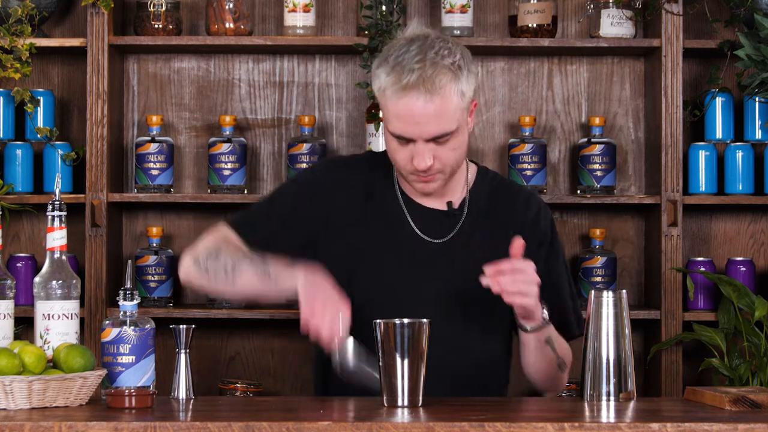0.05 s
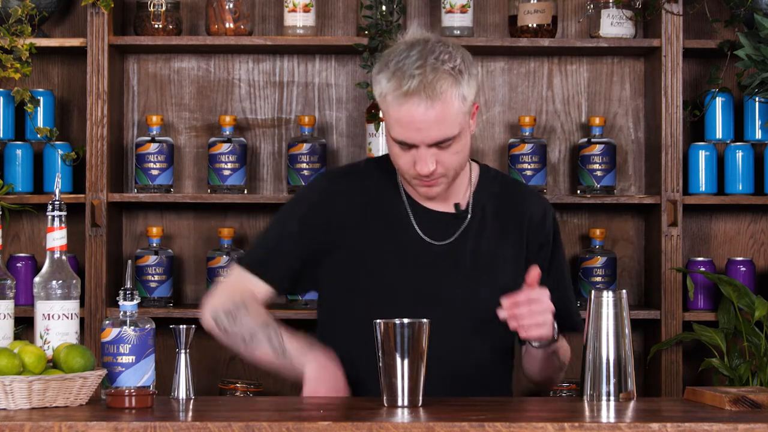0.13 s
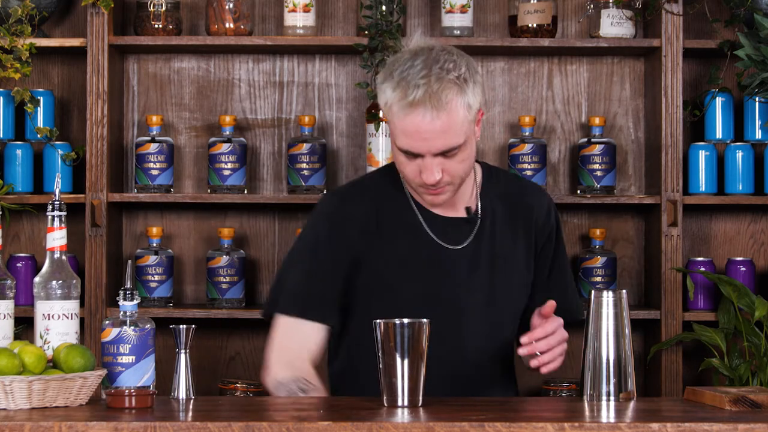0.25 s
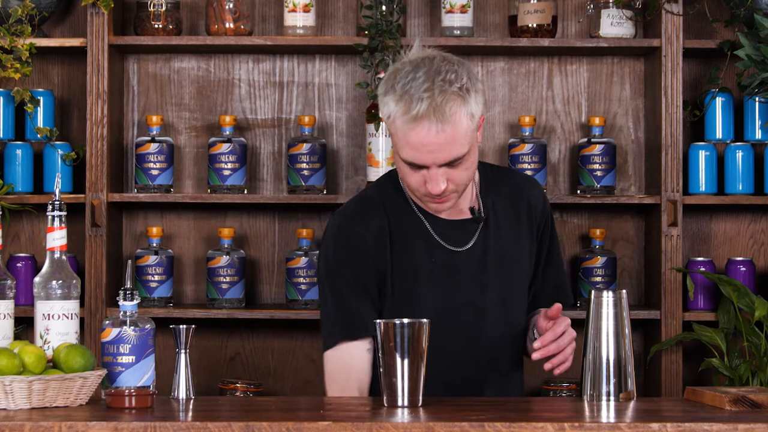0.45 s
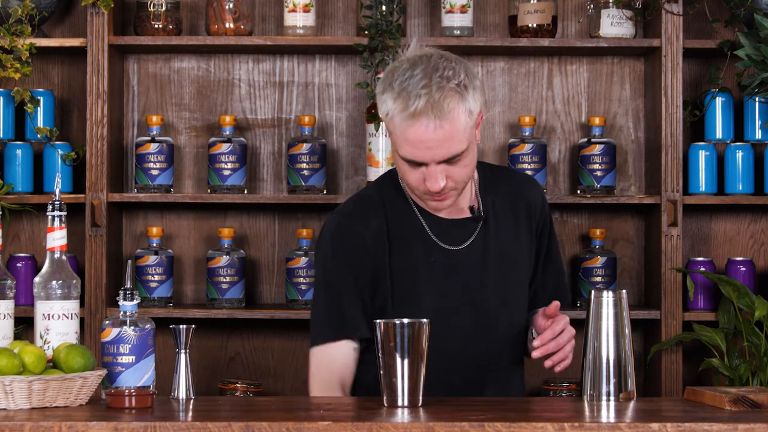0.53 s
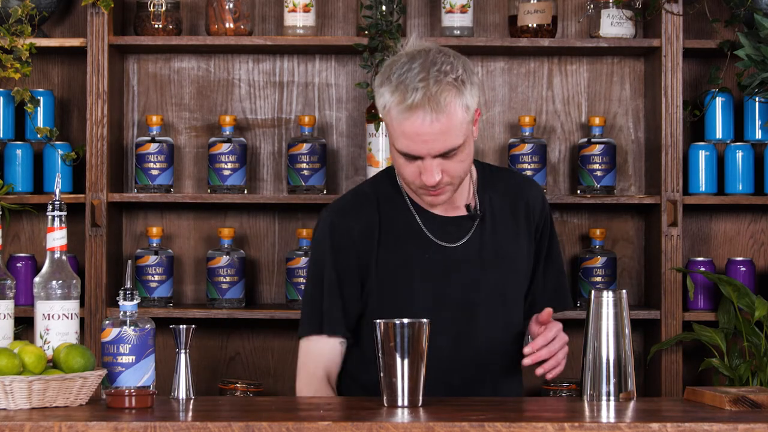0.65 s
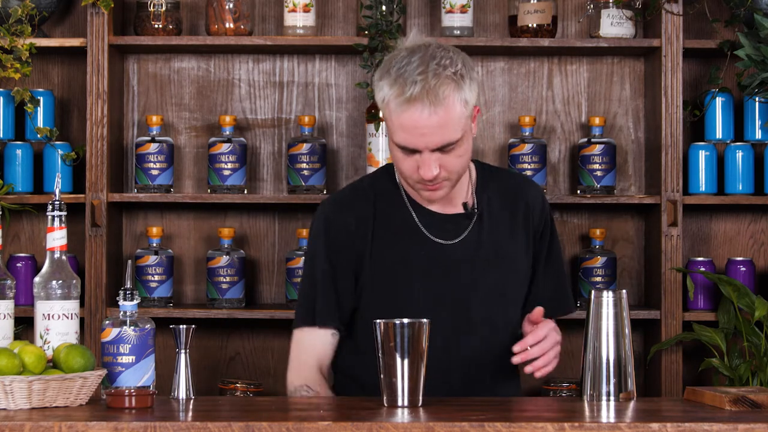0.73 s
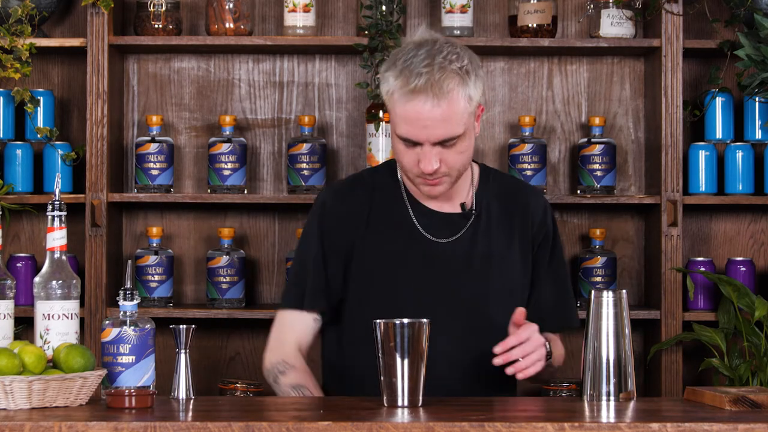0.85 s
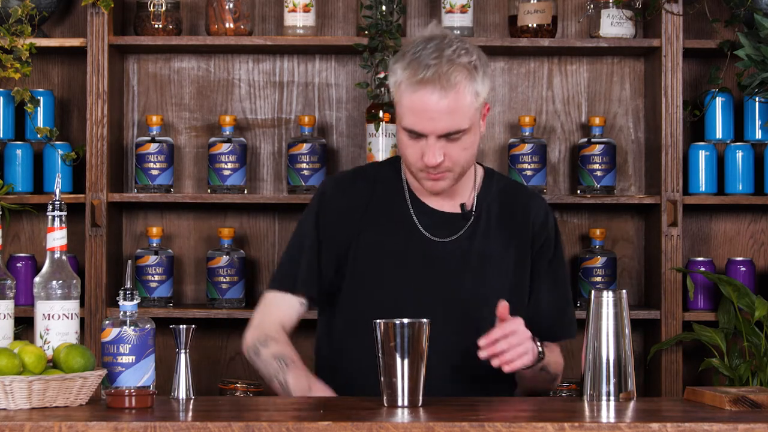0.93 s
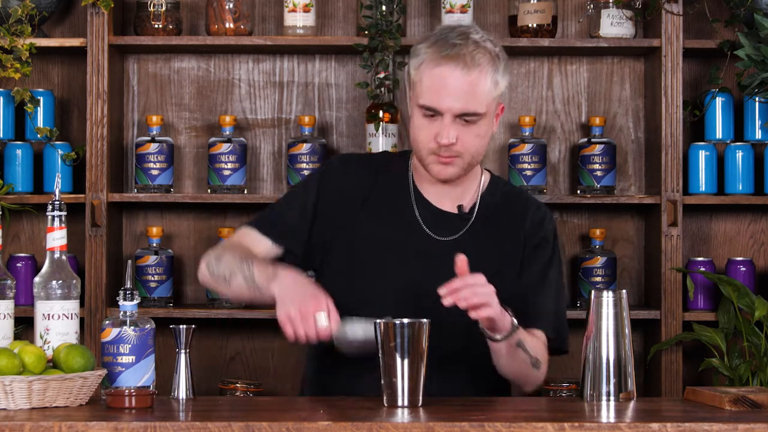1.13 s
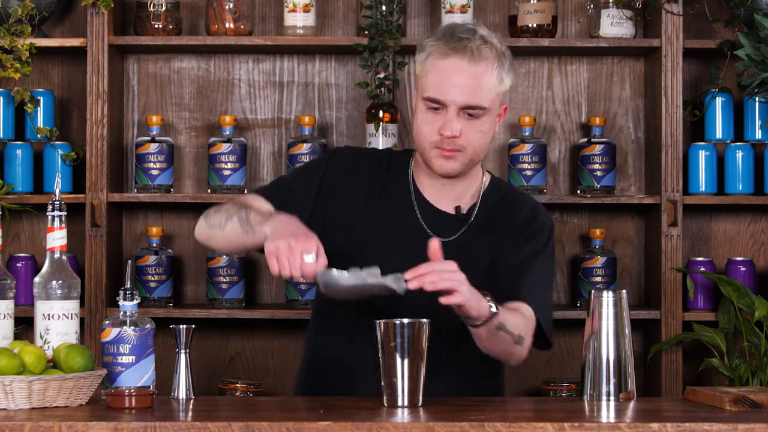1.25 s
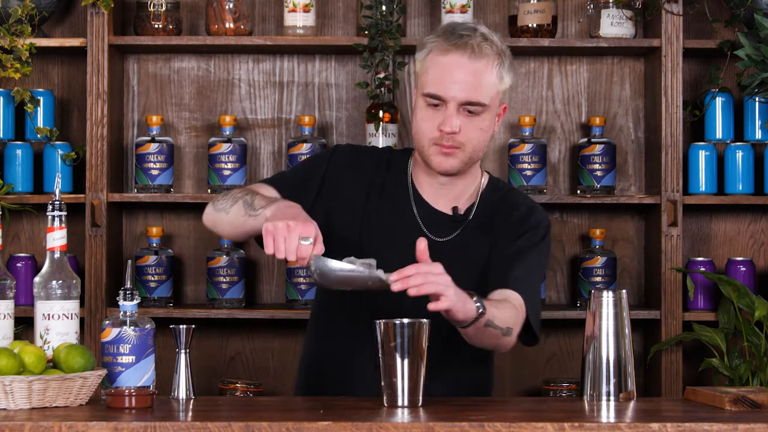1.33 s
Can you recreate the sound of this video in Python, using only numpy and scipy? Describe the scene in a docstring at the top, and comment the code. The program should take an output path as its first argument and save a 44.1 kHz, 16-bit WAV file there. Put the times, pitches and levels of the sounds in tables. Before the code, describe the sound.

Ice is scooped once from a bin under a bar counter, heard close up in a quiet room. The metal blade clinks, cubes clatter and crunch, and the rattle fades into a short scrape and light clicks.

```python
"""Scooping ice under a bar counter

Close microphone on an ice bin in a quiet room. A metal scoop digs in and its blade clinks,
duller once ice covers it. Cubes crunch, tumble and knock, and the hollow bin rings with them.
The full scoop slides out with a short drone, and a few cubes settle in it in the air."""
import sys
import numpy as np
from scipy import signal
from scipy.fft import rfft, irfft
from scipy.io import wavfile

SR = 44100
rng = np.random.default_rng(int(sys.argv[2]) if len(sys.argv) > 2 else 0)


def int16_out(signal):
    """Quantize to a 16-bit WAV file."""
    q = np.round(np.clip(np.atleast_2d(signal).T, -1, 1) * 32767)
    wavfile.write(sys.argv[1], SR, q.astype(np.int16))


N = 61739
T = np.arange(N) / SR

# Spectral shape of each source: frequency_hz, relative_db
ROOM_COLOUR = [(25, -13.5), (100, 6), (170, -7), (260, 5), (500, 2.5), (1200, -3.5), (2500, -14.5),
               (6000, -21), (15000, -28.5)]
RUMBLE_COLOUR = [(25, -21), (50, -13.5), (75, -5.5), (130, 2), (200, -4), (400, -26), (2000, -48)]
DRAG_COLOUR = [(100, -52), (220, -3.5), (330, -1.5), (430, 5.5), (560, -6), (720, -1), (1000, -18),
               (4000, -36)]
TUMBLE_COLOUR = [(35, -34), (90, -16), (160, -4.5), (350, -1), (750, -2), (1400, -4.5), (2100, -9),
                 (3500, -18), (6000, -32), (16000, -62.5)]
KNOCK_COLOUR = [(60, -22), (250, 1.5), (700, 5.5), (1500, 2.5), (2400, -11.5), (5000, -11), (15000, -40)]
CRACKLE_COLOUR = [(300, -27), (1500, -9.5), (2300, -5), (3300, 2.5), (4400, -4), (5100, -1), (6200, -3.5),
                  (7400, -6), (8800, -3.5), (10500, -7.5), (15500, -10.5)]
CLINK_COLOUR = [(200, -21.5), (900, -8.5), (2300, -14.5), (3200, -7.5), (4200, 1.5), (5600, -1.5),
                (7400, -6.5), (9000, -5), (12000, -6), (16000, -17)]
# Resonances of the hollow bin and of the metal scoop: pitch_hz, level_db, t60_s
BIN_MODES = [(193, 0.5, 0.21), (270, -3, .25), (300, -3.5, .28), (395, 8, 0.18), (455, 1, 0.38),
             (611.5, 0.5, 0.35), (710, 2, 0.31), (730, 6.5, 0.18), (857, -4.5, .22), (1034, -14, 0.16),
             (1081, -9, .22), (1255, -11.5, .2), (1283, 0, 0.31), (1420, -2, 0.15)]
SCOOP_MODES = [(3004, -1, .065), (3870, -10, 0.05), (4340, -5, .055), (4480, -9, 0.054), (5260, -0.5, .035),
               (5656, 2, .04), (6380, 0, 0.039), (8200, -5, .035), (8560, -6, .035), (8970, -10.5, .035),
               (11300, -10, .035), (13250, -16.5, 0.025)]
# Cubes shoved about by the scoop: time_s, level_db
TUMBLE_LEVELS = [(.259, -33), (.264, -26), (.277, -32), (.284, -22), (.32, -24), (.345, -20.5), (.384, -23),
                 (.425, -21), (.45, -18.5), (.472, -28), (.54, -31.5), (.62, -31), (.688, -39),
                 (.745, -38.5), (.795, -35.5), (.825, -45.5), (.935, -47.5), (1.01, -41.5), (1.06, -56.5),
                 (1.145, -66), (1.22, -60.5), (1.29, -81.5)]
# Ice cracking along the blade: time_s, level_db
CRACKLE_LEVELS = [(.259, -70), (.264, -31.5), (.31, -29), (.35, -25), (.384, -29.5), (.415, -31),
                  (.45, -32.5), (.475, -36.5), (.535, -42), (.575, -36.5), (.645, -39.5), (.69, -45),
                  (.72, -43.5), (.785, -40.5), (.835, -57), (.92, -46), (.94, -52.5), (1.01, -45.5),
                  (1.04, -62.5), (1.15, -71.5), (1.29, -83)]
# Top treble as ice covers the blade: time_s, gain_db
TREBLE_GAINS = [(0, 9.5), (.32, -1.5), (.375, -17), (.42, 0), (.47, -15.5), (.6, -12.5), (.8, -22.5),
                (1.0, -19)]
# The bin is bumped: start_s, level_db, pitch_hz
BIN_BUMPS = [(0.232, -34.5, 159), (0.294, -32, 90), (.342, -25, 140), (0.383, -35, 75), (0.968, -34, 130),
             (1.301, -50, 89)]
# A cube settles in the raised scoop: start_s, level_db, pitch_hz
SETTLING_TICKS = [(.175, -51, 1120), (.190, -51, 1690), (1.206, -51, 4300), (1.337, -50, 3060),
                  (1.366, -49, 2160), (1.386, -41, 1850)]
# A cube knocks in the bin: start_s, level_db, pitch_hz
CUBE_KNOCKS = [(.228, -14, 894), (0.232, -25.5, 449), (.236, -14.5, 1150), (0.326, -11, 1440),
               (0.351, -14.5, 626), (.445, -18.5, 755), (.451, -23, 990), (.630, -10, 1170),
               (.715, -23.5, 485), (0.7293, -16, 1300), (.794, -19.5, 626), (.8505, -23.5, 740),
               (.899, -27, 417), (.925, -30.5, 396), (.969, -22, 770), (1.160, -40, 1400),
               (1.184, -42, 598), (1.202, -33.5, 550), (1.232, -44, 903), (1.301, -46, 520)]
# The blade strikes a cube: start_s, level_db
BLADE_STRIKES = [(0.228, -9), (0.2392, -22.5), (0.262, -22), (.2665, -23.5), (.2805, -16.5), (.2835, -19.5),
                 (.3605, -26), (.411, -20), (.500, -32), (.517, -26), (.547, -25), (.554, -16.5),
                 (0.563, -17.5), (0.5664, -14), (.6312, -20.5), (.646, -31), (.670, -26), (.707, -31.5),
                 (.7305, -26.5), (0.754, -22), (0.7694, -14), (.7725, -22.5), (0.7833, -18), (.789, -26),
                 (.819, -23), (.885, -33), (.898, -34.5), (0.918, -36), (0.967, -29.5), (1.056, -45)]

TUMBLES_PER_S, TUMBLE_SCATTER_DB = 1800, 1.5
BLADE_HZ = 4420  # the blade's strongest resonance
CLINK_T60_S = 0.018


def amp(db):
    """Decibels to gain."""
    return 10 ** (np.asarray(db) / 20)


def unit(x):
    """Scale to rms 1."""
    return x / np.sqrt(np.mean(x ** 2))


def curve(points):
    """Gain over time from (time_s, level_db) points, silent before the first."""
    time_s, level_db = np.array(points).T
    return amp(np.interp(T, time_s, level_db, left=-120))


def fade(t60_s):
    """Exponential decay, 60 dB down after t60_s."""
    return np.exp(-np.log(1000) * T / t60_s)


def ring(hz, t60_s, size=12000):
    """One struck mode; it radiates no steady pressure."""
    t = T[:size]
    attack = 1 - np.exp(-4 * hz * t)
    motion = np.sin(2 * np.pi * hz * t) * fade(t60_s)[:size] * attack
    return np.diff(motion, prepend=0) / (2 * np.sin(np.pi * hz / SR))


def through(x, response):
    """Play a sound through an impulse response."""
    return signal.fftconvolve(x, response)[:N]


def colour(x, points):
    """Causal filter from (frequency_hz, relative_db) points that keeps the power of white noise."""
    hz, db = np.array(points).T
    grid_hz = np.maximum(np.fft.rfftfreq(N, 1 / SR), 1)
    gain = amp(np.interp(np.log(grid_hz), np.log(hz), db))
    cepstrum = irfft(np.log(gain), N)
    causal = cepstrum * (T > 0) * (T < T[-1] / 2)
    response = irfft(np.exp(2 * rfft(causal)), N)
    return through(x, response / np.linalg.norm(response))


def add(out, start_s, x):
    """Mix a sound in from start_s."""
    i = int(np.clip(start_s * SR, 0, N - 1))
    out[i:i + len(x)] += x[:N - i]


def contacts(per_s, scatter_db):
    """Irregular impulses of uneven strength."""
    occurs = rng.random(N) < per_s / SR
    strength = amp(scatter_db * np.clip(rng.standard_normal(N), -2, 2))
    return occurs * strength * np.sign(rng.standard_normal(N))


def crumble(hits):
    """Each contact trails a few milliseconds of fine grit."""
    power = np.maximum(through(hits ** 2, fade(t60_s=0.016) ** 2), 0)
    grit = unit(np.sqrt(power) * rng.standard_normal(N))
    return unit(unit(hits) + amp(3) * grit)


def bursts(events, t60_s, points):
    """A short coloured crash for each (start_s, level_db, ...) event."""
    power, decay = np.zeros(N), fade(t60_s) ** 2
    for start_s, level_db, *_ in events:
        add(power, start_s, amp(level_db) ** 2 * decay)
    return colour(np.sqrt(power) * rng.choice([-1, 1], N), points)


def room_tone():
    """The quiet room around the bar: faint, steady, low noise."""
    return amp(-63.5) * colour(rng.standard_normal(N), ROOM_COLOUR)


def reflections(x, t60_s, level_db):
    """Dense echoes reach the microphone after a short gap and die away."""
    tail = rng.standard_normal(N) * fade(t60_s) * (T > 0.0015)
    return amp(level_db) * through(x, tail / np.linalg.norm(tail))


def bin_resonance(cubes):
    """The bin's walls and cavity ring with the cubes."""
    body = sum(amp(db) * ring(hz, t60_s) for hz, db, t60_s in BIN_MODES)
    return amp(-6.5) * through(cubes, 2 * body / np.abs(rfft(body)).max())


def bin_rumble(peak_s=0.355, width_s=0.095):
    """The bin rumbles as the push swells and eases."""
    push = amp(-36.5) * np.exp(-((T - peak_s) / width_s) ** 2)
    return push * colour(rng.standard_normal(N), RUMBLE_COLOUR)


def bin_bumps(t60_s=0.05):
    """Low thuds of the bin under the push of the scoop."""
    out = amp(-8) * bursts(BIN_BUMPS, t60_s, RUMBLE_COLOUR)
    for start_s, level_db, pitch_hz in BIN_BUMPS:
        add(out, start_s, amp(level_db) * ring(pitch_hz, t60_s))
    return out


def scoop_drag(start_s=0.834, end_s=1.0, release_db_per_s=124.5):
    """The bin drones as the full scoop slides out along it."""
    onset = np.clip((T - start_s) / 0.015, 0, 1)
    release = amp(-release_db_per_s * np.maximum(T - end_s, 0))
    scrape = colour(contacts(TUMBLES_PER_S, TUMBLE_SCATTER_DB), DRAG_COLOUR)
    return amp(-31.5) * scrape * onset * release


def settling_cubes(ring_cycles=9):
    """Cubes tap lightly in the scoop while it is held in the air."""
    out = amp(-7) * bursts(SETTLING_TICKS, CLINK_T60_S, CRACKLE_COLOUR)
    for start_s, level_db, pitch_hz in SETTLING_TICKS:
        add(out, start_s, amp(level_db) * ring(pitch_hz, ring_cycles / pitch_hz))
    return out


def tumbling_cubes():
    """Cubes shoved by the scoop jostle in a dense, dull clatter."""
    hits = crumble(contacts(TUMBLES_PER_S, TUMBLE_SCATTER_DB))
    return colour(hits, TUMBLE_COLOUR) * curve(TUMBLE_LEVELS)


def knocking_cubes(ring_cycles=5.66):
    """Short dead knocks, each with a rattle of the neighbouring cubes."""
    out = amp(-11.5) * bursts(CUBE_KNOCKS, t60_s=0.03, points=KNOCK_COLOUR)
    for start_s, level_db, pitch_hz in CUBE_KNOCKS:
        add(out, start_s, amp(level_db) * ring(pitch_hz, ring_cycles / pitch_hz))
    return out


def ice_cover(x, split_hz=5940):
    """The first bite is bright; ice piled over the blade then absorbs the top treble."""
    dull = signal.sosfiltfilt(signal.butter(1, split_hz, fs=SR, output="sos"), x)
    return dull + (x - dull) * curve(TREBLE_GAINS)


def cracking_ice(size=900):
    """Every crack rings briefly at its own pitch, and sliding cubes rub the blade into a short ring."""
    cracks = contacts(per_s=1600, scatter_db=3.5)
    pitch_hz = rng.uniform(1500, 15500, N)
    rings, decay = np.zeros(N), fade(t60_s=0.028)[:size]
    for i in np.flatnonzero(cracks):
        add(rings, T[i], cracks[i] * decay * np.sin(2 * np.pi * pitch_hz[i] * T[:size]))
    crunch = unit(colour(crumble(cracks) + amp(-2) * unit(rings), CRACKLE_COLOUR))
    rub = amp(-12) * unit(through(cracks, ring(BLADE_HZ, t60_s=0.01)))
    return (crunch + rub) * curve(CRACKLE_LEVELS)


def blade_clinks(dig_s=0.255, gripped_t60_ratio=0.74, modes_db=-17.5):
    """Strikes ring the scoop's modes; gripped by ice they die sooner and the blade's main note leads."""
    out = amp(-4.5) * bursts(BLADE_STRIKES, CLINK_T60_S, CLINK_COLOUR)
    free = sum((-1) ** k * amp(db) * ring(hz, t60) for k, (hz, db, t60) in enumerate(SCOOP_MODES))
    gripped = np.array([amp(db) * ring(hz, t60 * gripped_t60_ratio) for hz, db, t60 in SCOOP_MODES])
    for start_s, level_db in BLADE_STRIKES:
        signs = rng.choice([-1, 1], len(SCOOP_MODES))
        weights = signs * amp(modes_db + rng.standard_normal(len(SCOOP_MODES)))
        note_hz = BLADE_HZ * (1 + 0.015 * rng.standard_normal())
        note = amp(-10.5) * ring(note_hz, t60_s=0.024)
        clink = amp(modes_db) * free if start_s < dig_s else weights @ gripped + note
        add(out, start_s, amp(level_db) * clink)
    return out


def scene():
    """One microphone close to the bin, with the room around the bar behind it."""
    cubes = tumbling_cubes() + scoop_drag() + bin_rumble() + knocking_cubes()
    blade = ice_cover(cracking_ice() + blade_clinks())
    in_bin = amp(-1.5) * (cubes + bin_resonance(cubes)) + amp(2) * blade
    bin_echo = reflections(in_bin, t60_s=0.16, level_db=-16.5)
    close = in_bin + bin_echo + bin_bumps() + settling_cubes()
    room_echo = reflections(close, t60_s=0.39, level_db=-14)
    return (close + room_echo + room_tone())[None]


def record(dry):
    """The recorder cuts the treble above 15.8 kHz."""
    return signal.sosfilt(signal.ellip(8, 0.2, 75, 15800, fs=SR, output="sos"), dry)


dry = scene()
out = record(dry)
int16_out(out)
```